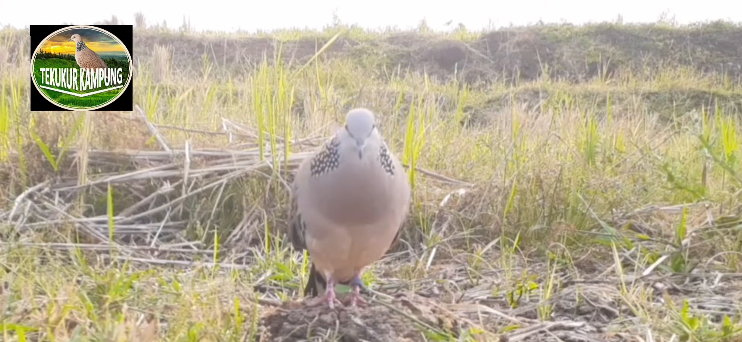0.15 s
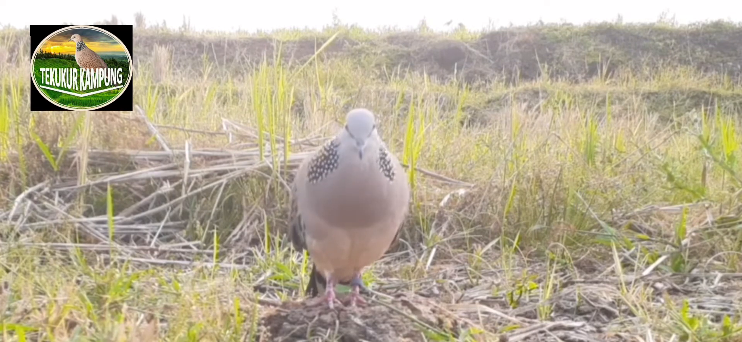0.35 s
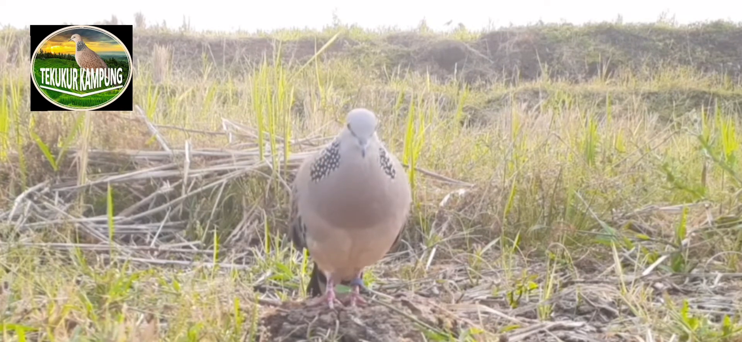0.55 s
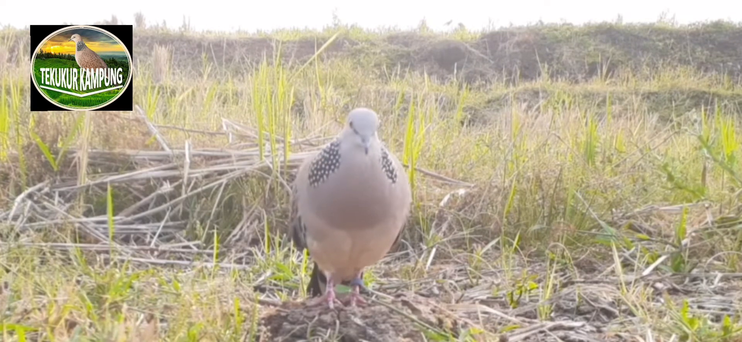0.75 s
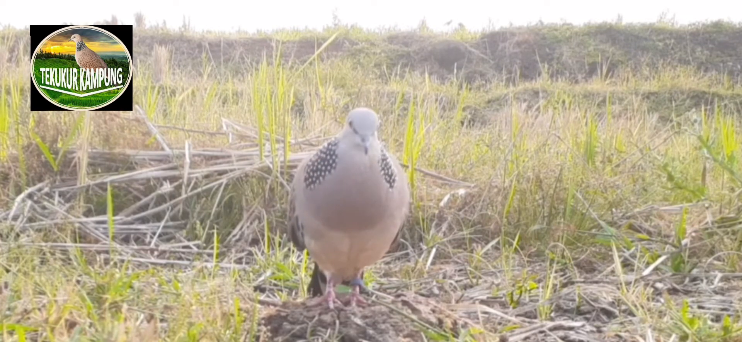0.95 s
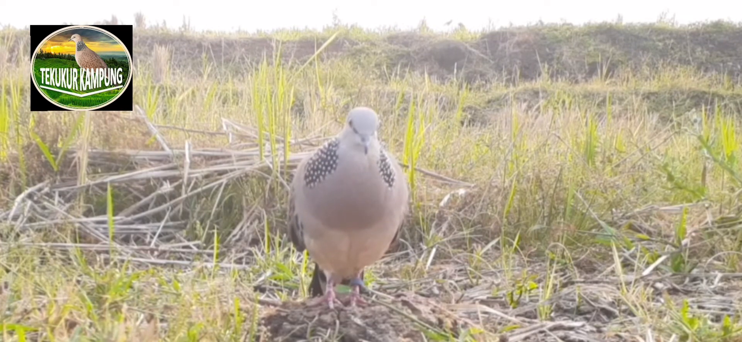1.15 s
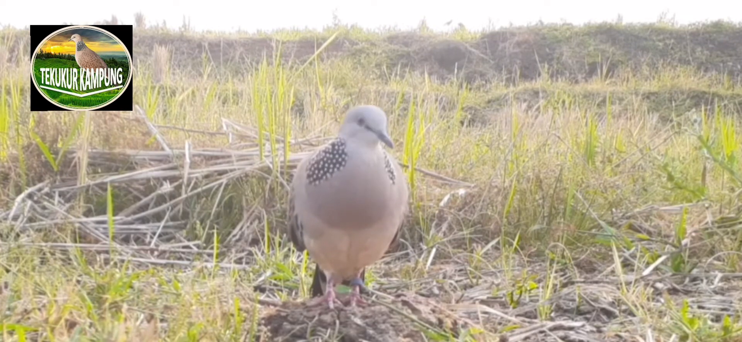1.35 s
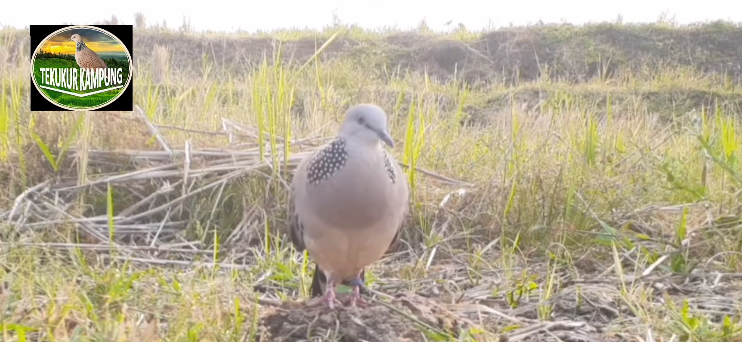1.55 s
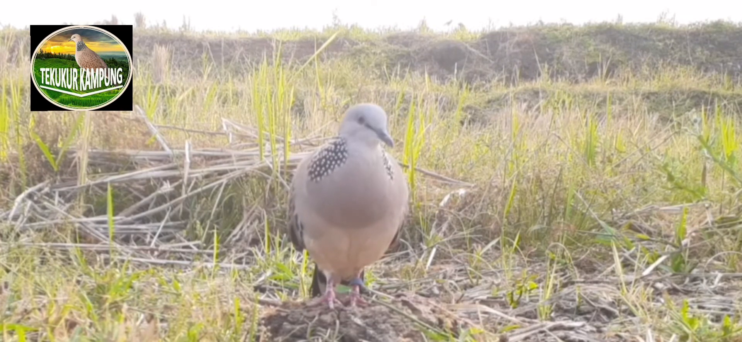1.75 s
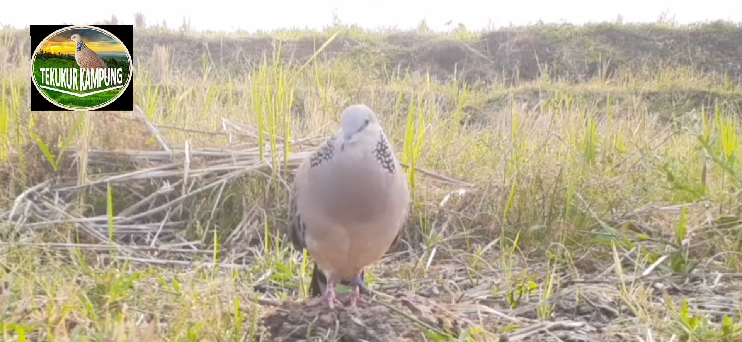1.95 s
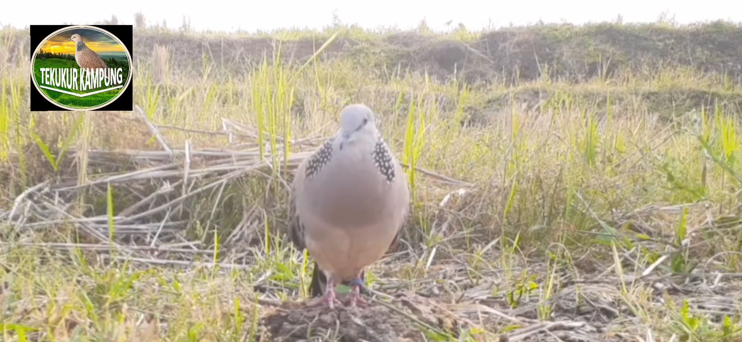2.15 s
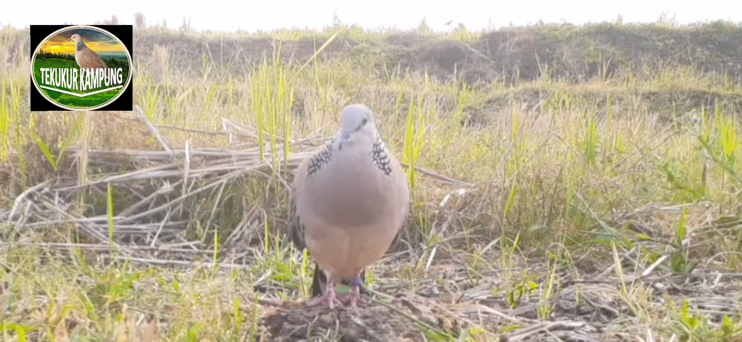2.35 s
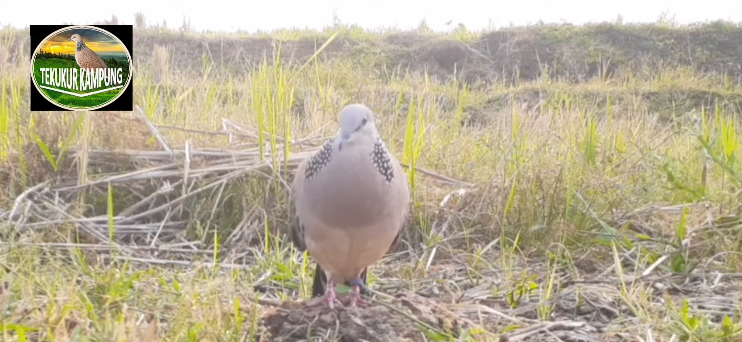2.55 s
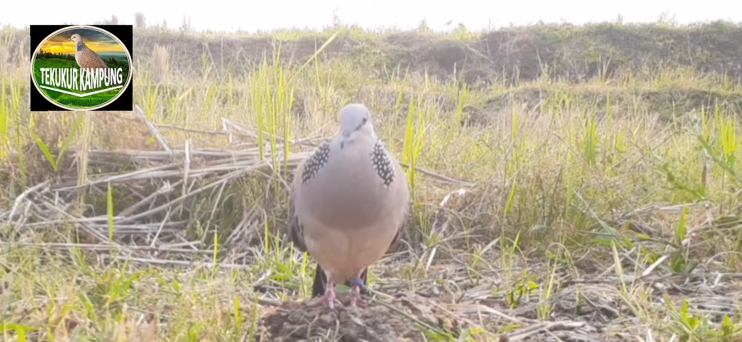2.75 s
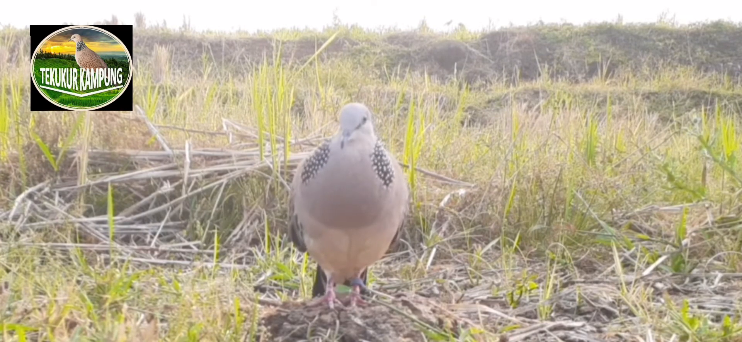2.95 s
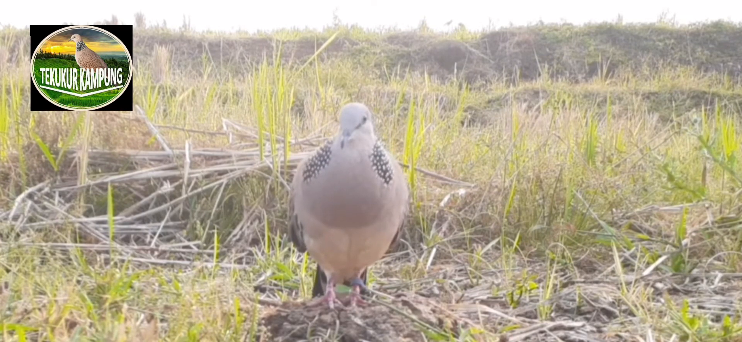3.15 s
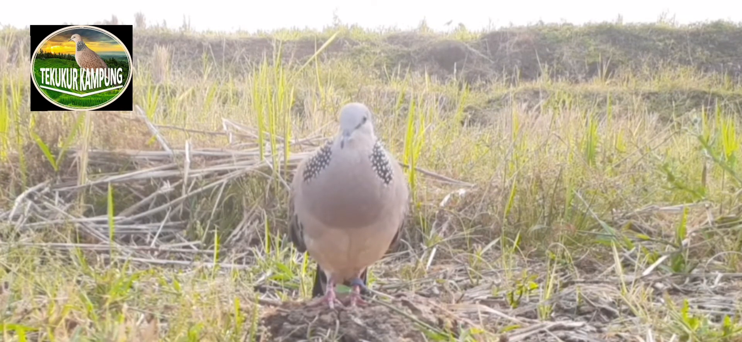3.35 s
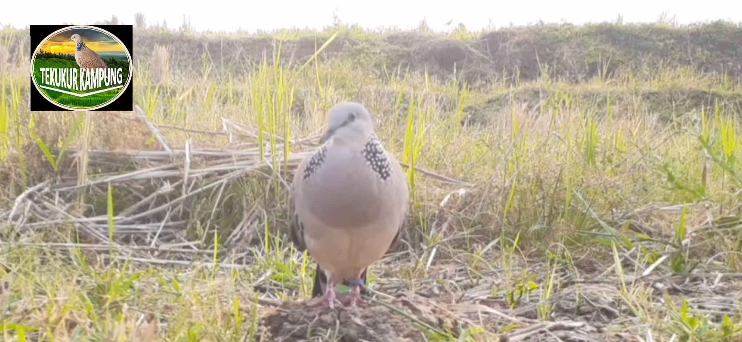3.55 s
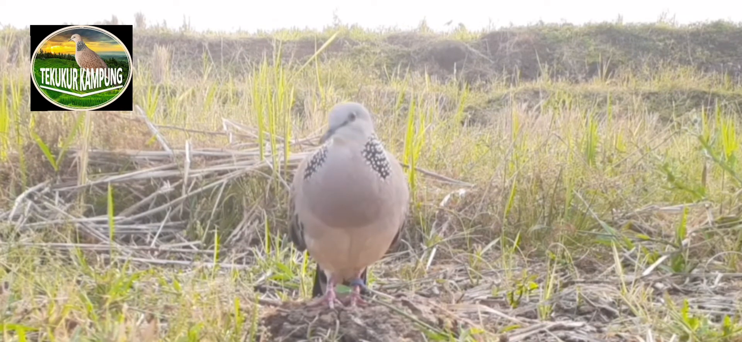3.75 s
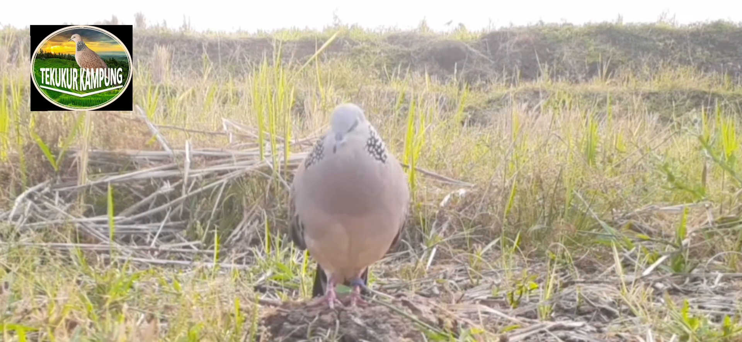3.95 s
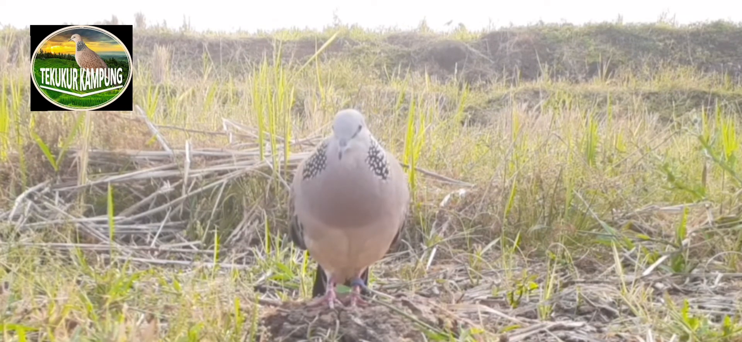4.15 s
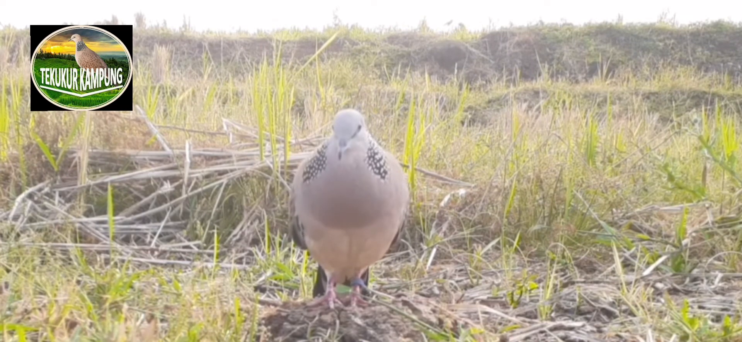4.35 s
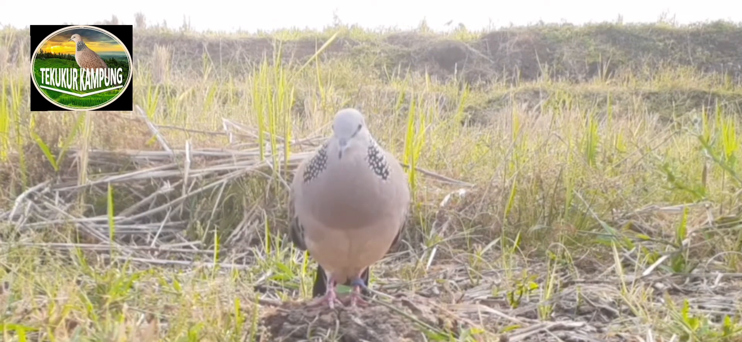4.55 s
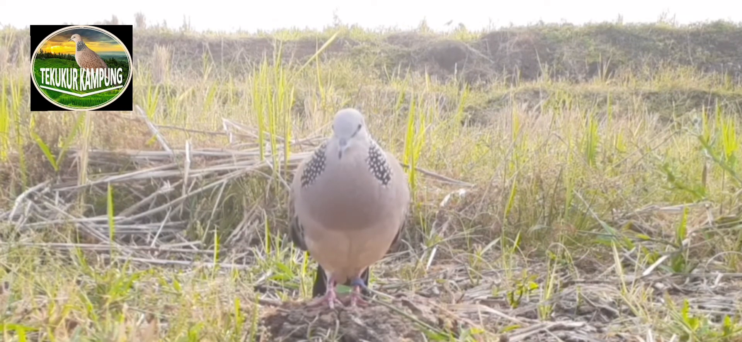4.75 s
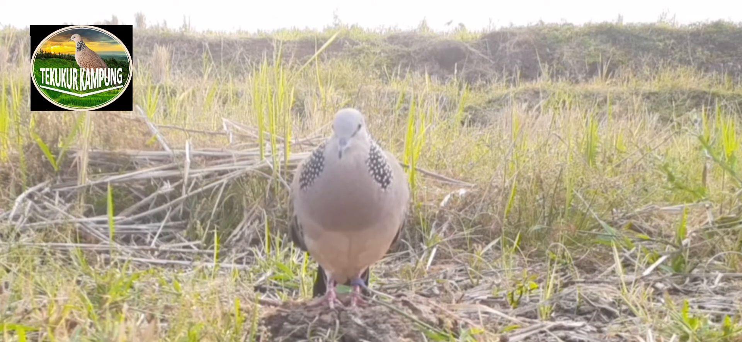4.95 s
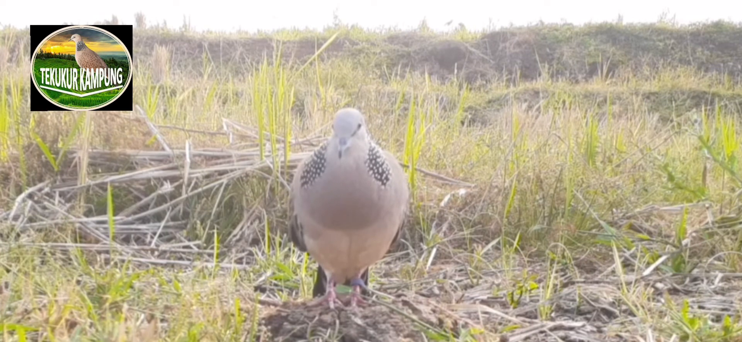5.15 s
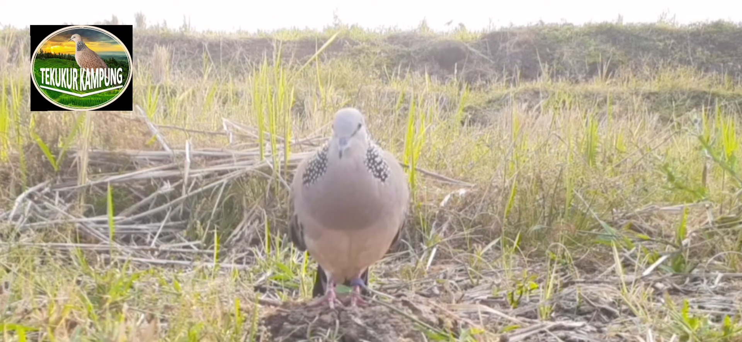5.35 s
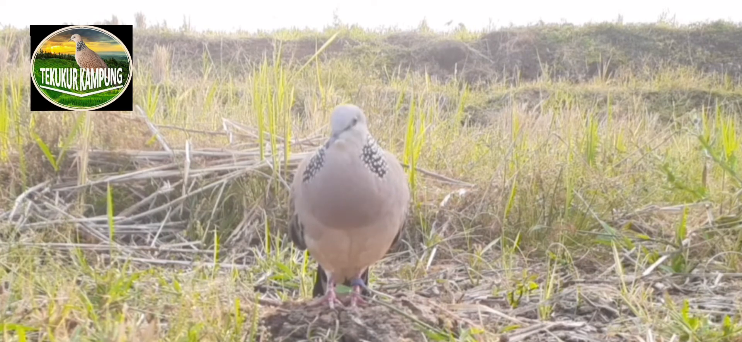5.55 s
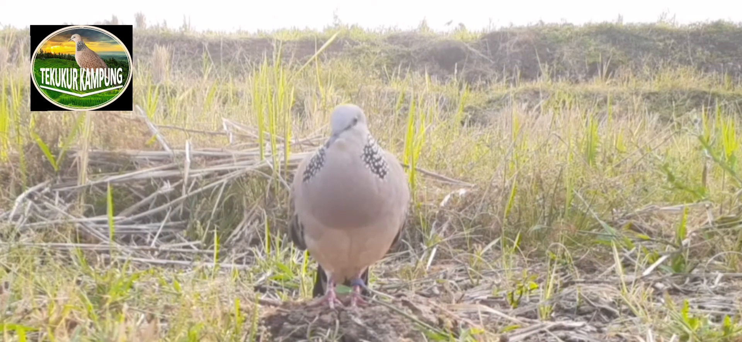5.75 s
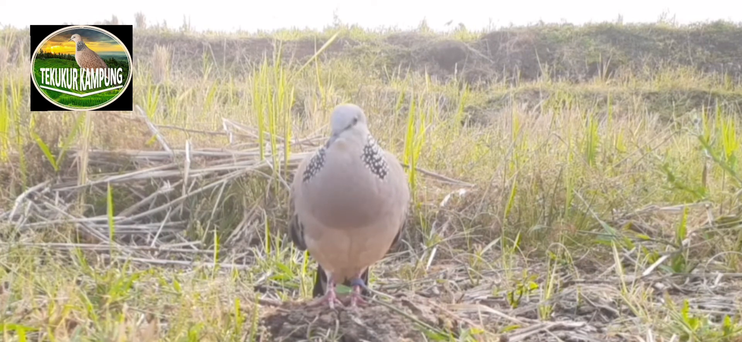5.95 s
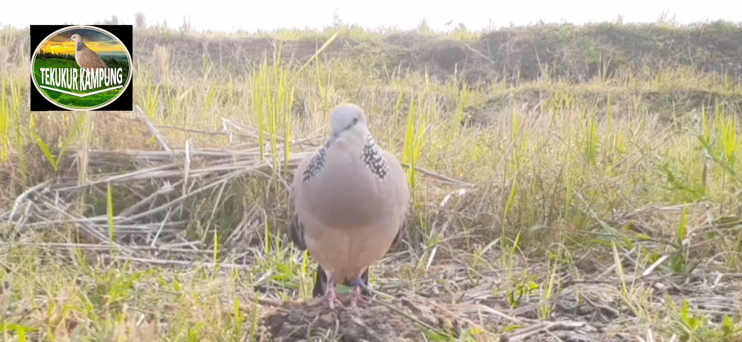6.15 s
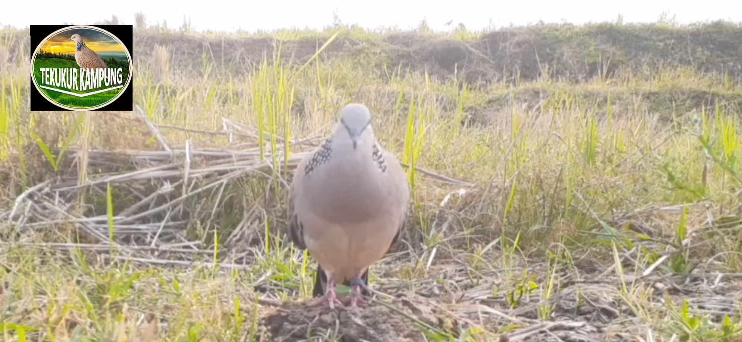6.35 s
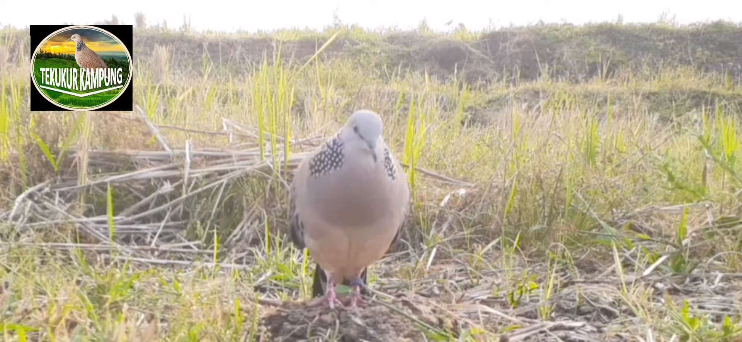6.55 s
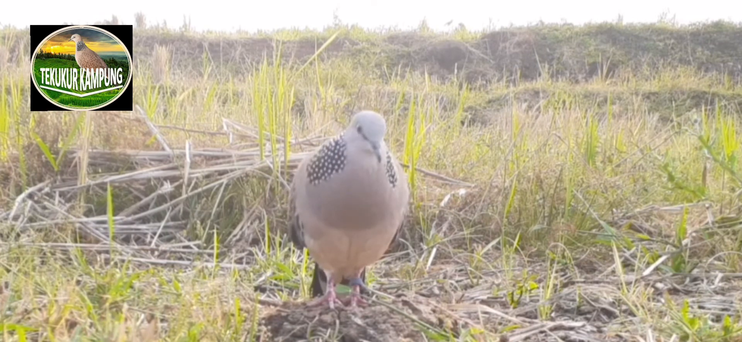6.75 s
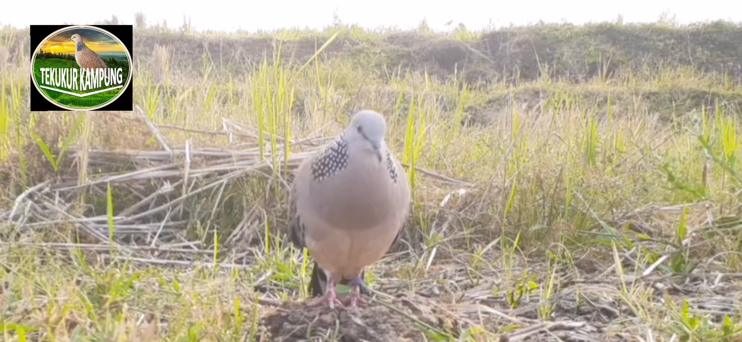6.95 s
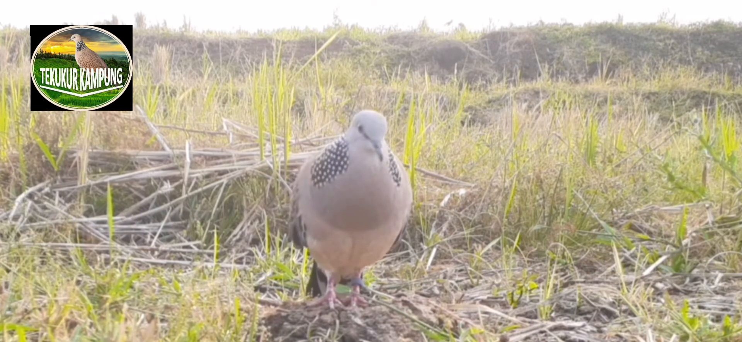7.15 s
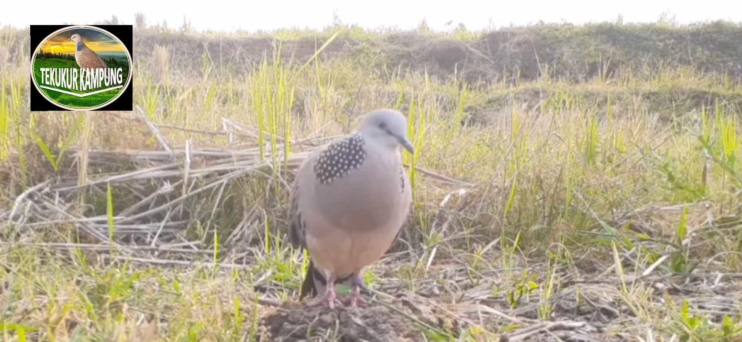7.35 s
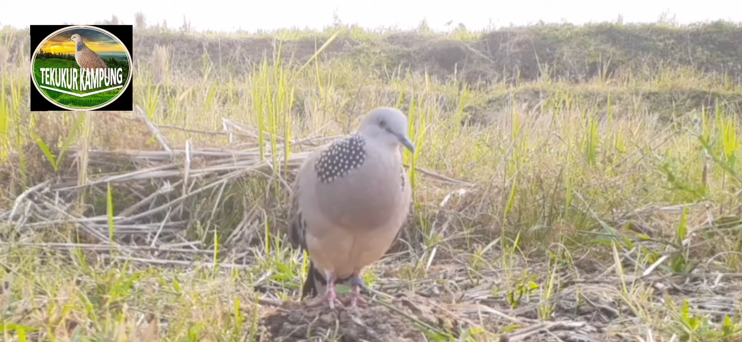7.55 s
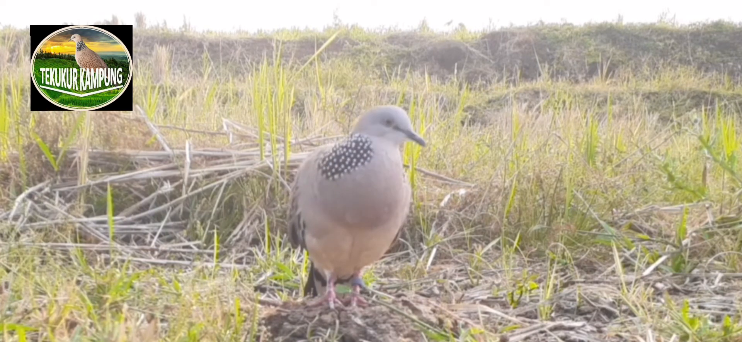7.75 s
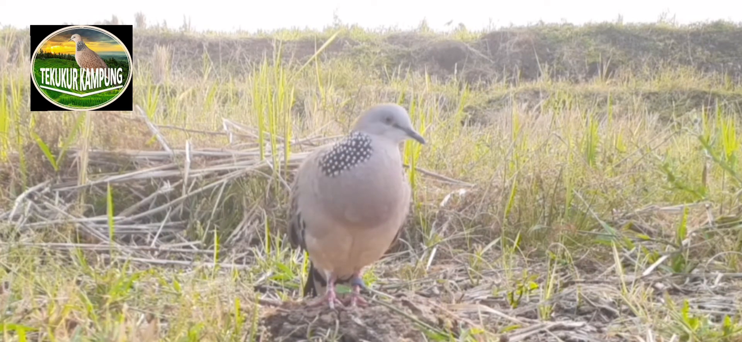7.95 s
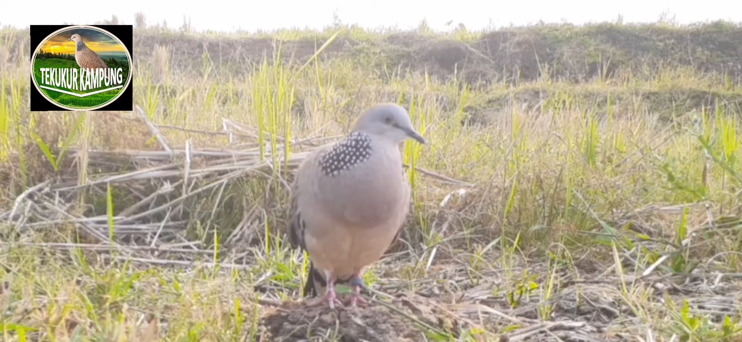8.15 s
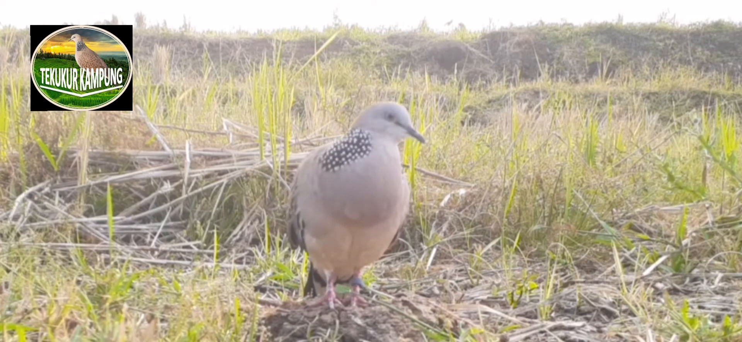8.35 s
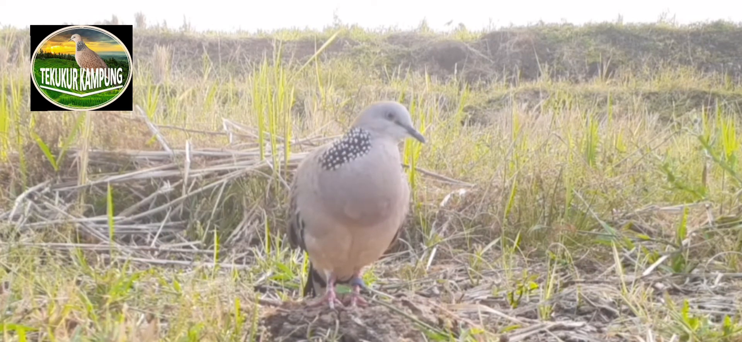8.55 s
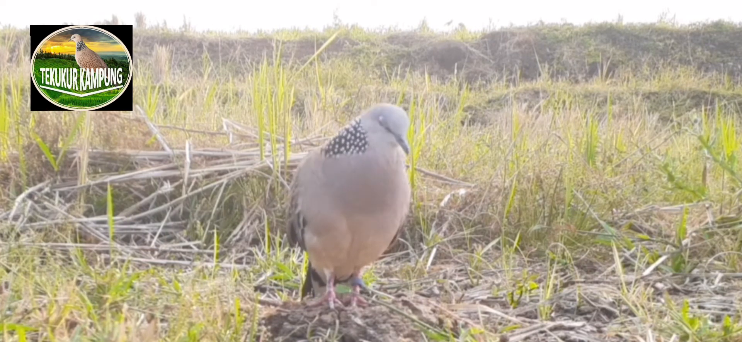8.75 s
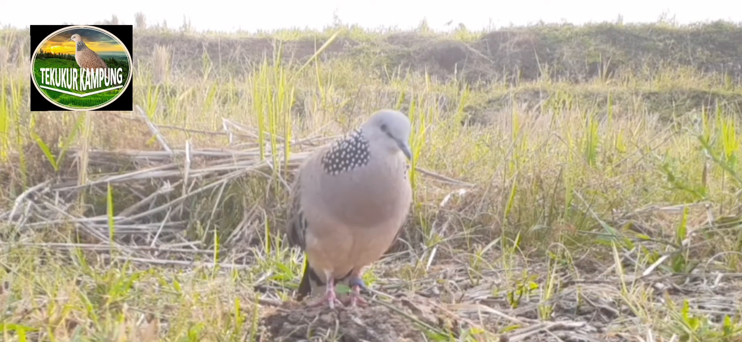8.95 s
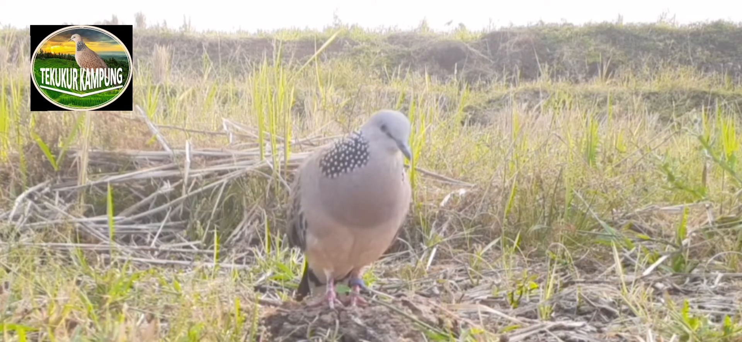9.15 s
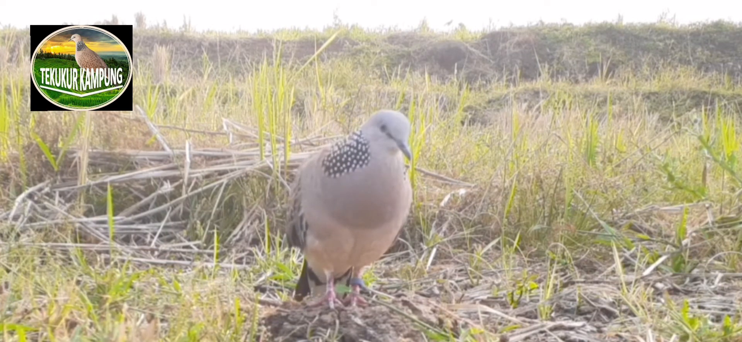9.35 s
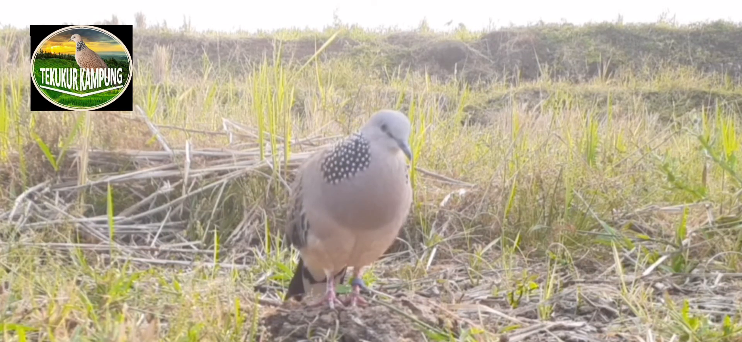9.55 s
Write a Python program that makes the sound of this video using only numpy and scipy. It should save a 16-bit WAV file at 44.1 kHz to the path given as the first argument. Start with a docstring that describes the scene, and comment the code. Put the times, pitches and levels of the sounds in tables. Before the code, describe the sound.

In a quiet field, a nearby dove repeats two short coos and a long trilled one, with faint rumble and insects behind.

```python
"""Two short coos joined by a low purr, then a long trilled coo that sinks away: a spotted dove on the
ground of an open field gives this phrase five times. Its voice is a near-pure tone, amplitude-modulated
by a fluttering membrane and filtered by the resonance of the inflated throat. Another dove answers far
off, over a faint low rumble and the thin shrill of insects. A noise gate dips the level between calls."""
import sys
import numpy as np
from scipy import signal
from scipy.fft import rfft, irfft
from scipy.io import wavfile
from scipy.ndimage import uniform_filter1d, minimum_filter1d

SR = 44100
rng = np.random.default_rng(int(sys.argv[2]) if len(sys.argv) > 2 else 0)


def wrap_up_sound(samples):
    """Save the sound to the file named by the first command line argument, as 16-bit audio."""
    columns = np.atleast_2d(samples).T
    # keep every value between -1 and 1, then stretch to whole-number steps
    tamed = np.clip(columns, -1, 1)
    steps = np.round(tamed * 32767).astype(np.int16)
    wavfile.write(sys.argv[1], SR, steps)


N = 427329
TIME = np.arange(N) / SR


def doves(octave_db=-29.5, whistle_db=-53.5):
    """Source and filter: the syrinx makes the tone, the throat colours it and the field reflects it."""
    # Each row: start, purr start, purr end and end in seconds, drive of the first and second coo in dB,
    # slack at the bottom of the purr (0 is taut).
    double_coos = [(0.014, 0.065, .229, .329, -7.8, -6.5, .75), (1.895, 1.969, 2.110, 2.219, -8.3, -5.5, 1),
                   (3.936, 4.006, 4.173, 4.283, -7.5, -4.8, 1), (6.427, 6.490, 6.657, 6.780, -5, -5.2, 1),
                   (8.766, 8.835, 9.014, 9.125, -6, -5.2, 1.04)]
    # Each row: start, fall start and end in seconds, drive in dB, first flutter rate per second,
    # seconds for that rate to double. The two faint rows are the far dove.
    long_coos = [(0.487, 0.823, 1.04, -4.5, 49.6, 0.29), (2.383, 2.685, 2.892, -4.5, 42.6, 0.25),
                 (4.439, 4.757, 4.98, -4.5, 45, 0.29), (5.6, 5.923, 6.1, -58, 35, 0.27),
                 (6.94, 7.251, 7.48, -4.5, 41.8, .252), (7.81, 8.105, 8.29, -58.5, 43, .3),
                 (9.286, 9.591, 9.84, -4.5, 43.4, 0.26)]
    notes = sum(double_coo(*row) for row in double_coos) + sum(long_coo(*row) for row in long_coos)
    tone, octave, whistle, rasp_strength = notes
    voice = throat(tone + from_db(octave_db) * octave + grunt())
    breath = bill_air(tone, rasp_strength)
    return (voice + field(voice) + from_db(whistle_db) * whistle + breath) * pan(left_db=3.6)


def double_coo(start, purr_begins, purr_ends, end, first_db, second_db, sag_depth):
    """Tension sets pitch and drive: between two coos the pressure sags and the slack membrane purrs."""
    taut_hz, slack_hz, slack_db, droop_hz = 737.3, 310.3, 12, 65
    rise_s, drop_s, drop_db = .034, .032, 3
    purr_per_s, purr_edge_s, purr_depth, purr_swing_hz, purr_push_db = 84, .007, .81, 109, 1.5
    t = TIME[(TIME > start) & (TIME < end)]
    progress = (t - purr_begins) / (purr_ends - purr_begins)
    through_purr = ramp(progress)
    through_second = ramp((t - purr_ends) / (end - purr_ends))
    purring = ramp(1 + np.minimum(t - purr_begins, purr_ends - t) / purr_edge_s) ** .5
    # the membrane tightens at the start, sags in the purr and lets go at the end
    onset = ramp(1 - (t - start) / rise_s) ** 2
    sag = sag_depth * np.sin(np.pi * through_purr ** .8)
    drop = ramp(1 - (end - t) / drop_s) ** 1.9
    slack = onset + sag + drop
    pitch = taut_hz - slack_hz * slack - droop_hz * through_second ** 2
    push_db = (second_db - first_db + purr_push_db * purring) * through_purr
    drive_db = first_db + push_db - slack_db * slack - drop_db * drop
    # a whole number of flutters fills the purr, fastest in the slack middle
    count = np.round(purr_per_s * (purr_ends - purr_begins))
    flutters = count * (progress - .091 * np.sin(2 * np.pi * progress) / (2 * np.pi))
    swing = purr_swing_hz * purring * (1 - .64 * sag)
    return syrinx(t, pitch, drive_db, purr_depth * purring, swing, flutters)


def long_coo(start, fall_begins, end, level_db, first_rate, doubling_s):
    """Modulation of level and pitch: a deep trill grows shallower as it quickens, then sinks away."""
    trill_hz, fastest_per_s, swell_db = 712.5, 100, .5
    slow_depth, fast_depth, slow_swing_hz, fast_swing_hz = .96, .48, 300.6, 45
    scoop_s, scoop_hz, scoop_db = .038, 157, 14   # it starts low and soft
    fall_hz, fall_db = 286, 19
    t = TIME[(TIME > start) & (TIME < end)]
    rate = np.minimum(first_rate * (1 + ((t - start) / doubling_s) ** 2.5), fastest_per_s)
    slow = (fastest_per_s - rate) / (fastest_per_s - first_rate)
    scoop = ramp(1 - (t - start) / scoop_s)
    fall = ramp((t - fall_begins) / (end - fall_begins))
    trilling = 1 - .55 * ramp(2 * fall)
    depth = (fast_depth + (slow_depth - fast_depth) * slow) * trilling * (1 - scoop ** 3)
    swing = (fast_swing_hz + (slow_swing_hz - fast_swing_hz) * slow * (1 - scoop) ** 2) * trilling
    pitch = trill_hz + .3 * swing - scoop_hz * scoop - fall_hz * fall
    drive_db = level_db - swell_db * slow - scoop_db * scoop ** 4.1 - fall_db * fall ** 1.4
    return syrinx(t, pitch, drive_db, depth, swing, np.cumsum(rate) / SR)


def syrinx(t, pitch, drive_db, depth, swing, flutters, wander=.25, jitter=.006, uneven_db=1.4):
    """A membrane valve modulates the tone: each flutter snaps it open, arches the pitch and shuts it."""
    # Each row: share of the flutter cycle, opening of the membrane from 0 to 1.
    flutter_shape = [(0, 0), (.15, .03), (.3, 1), (.68, .72), (.9, .03), (1, 0)]
    depth = np.clip(depth, 0, 1)
    # a shallow flutter loses its beat, and only now and then shuts fully
    flutters = flutters + wander * (1 - depth) * waver(t, per_s=44)
    nearest = np.round(flutters - np.floor(flutters.min())).astype(int)
    slip, strength, looseness = rng.uniform(-1.6, 1, (200, 3))[nearest].T
    closure = ramp(depth * (1 + 1.6 * (1 - depth) * looseness))
    cycle = flutters % 1
    opening = uniform_filter1d(1 - closure * (1 - along(flutter_shape, cycle)[0]), size=36)
    hz = (pitch - swing * np.cos(np.pi * cycle) ** 2) * (1 + jitter * waver(t, per_s=440))
    # the tone restarts out of step after each closure
    slips = np.diff(np.floor(flutters), prepend=np.floor(flutters[0])) * np.pi * slip * closure
    smooth_slips = np.convolve(slips, signal.get_window("hann", 100) / 50, "same")
    phase = np.cumsum(2 * np.pi * hz / SR + smooth_slips)
    strength_db = uniform_filter1d(uneven_db * depth * strength, size=256)
    edge_fade = np.sin(np.pi / 2 * ramp(np.minimum(t - t[0], t[-1] - t) / .009)) ** 1.5
    level = from_db(drive_db + strength_db) * opening * edge_fade
    tone = level * np.sin(phase)
    octave = level ** 1.3 * np.sin(2 * phase)
    whistle = level ** 3 * np.sin(8 * phase)   # a thin harmonic of the hard-blown tone
    rasp_strength = level ** 2 * depth
    note = np.zeros((4, N))
    note[:, np.round(t * SR).astype(int)] = tone, octave, whistle, rasp_strength
    return note


def throat(x, hz=623.5, width_hz=350):
    """Cavity resonance: the inflated throat acts as one broad band-pass, applied twice."""
    radius = np.exp(-np.pi * width_hz / SR)
    b = (1 - radius ** 2) / 2 * np.array([1, 0, -1])
    a = [1, -2 * radius * np.cos(2 * np.pi * hz / SR), radius ** 2]
    return signal.lfilter(b, a, signal.lfilter(b, a, x + 1e-18))


def grunt(tilt_db=-6.0):
    """A harmonic series without its fundamental: one soft, low buzz within the third phrase."""
    # Each row: time in seconds, pitch in Hz, level of the fourth harmonic in dB ahead of the throat.
    contour = [(4.32, 192, -73), (4.34, 193, -39), (4.365, 170.5, -41), (4.382, 165, -50.5),
               (4.4, 151, -55.5)]
    pitch, level_db = along(contour, TIME)
    phase = 2 * np.pi * np.cumsum(pitch) / SR
    buzz = sum(from_db(tilt_db * (k - 4)) * np.cos(k * phase) for k in range(2, 6))
    return buzz * from_db(level_db) * (TIME > contour[0][0]) * (TIME < contour[-1][0])


def bill_air(tone, rasp_strength, air_db=-57.5, rasp_db=-51):
    """Flow noise: air rushes through the bill in step with the tone and rasps when it flutters."""
    # Each row: frequency in Hz, relative spectral density in dB.
    air_spectrum = [(900, 4), (1300, -1), (1800, -12), (2400, -6), (3400, -13), (4600, -8.5), (5600, -5.5),
                    (5900, 5), (6150, -9.5), (7500, -8.5), (12000, -17)]
    airflow = np.sqrt(np.abs(uniform_filter1d(tone ** 2, size=1024)))
    air = from_db(air_db) * airflow * noise(air_spectrum, likeness=[(1000, 1.0), (6000, .63)])
    rasp = from_db(rasp_db) * uniform_filter1d(rasp_strength, size=3072)
    return air + rasp * noise_band(hz=5440, width_hz=1200)[0]


def field(x, echo_s=.031, echo_db=-34, scatter_db=-37, decay_s=.25):
    """Reflection and scattering: a bank returns one weak echo, ground and stubble a short tail."""
    t = TIME[:SR // 2]
    scatter = rng.standard_normal((2, len(t))) * from_db(-60 * t / decay_s) * (t > .008)
    scatter /= np.sqrt(np.sum(scatter ** 2, axis=1, keepdims=True))
    echo = from_db(echo_db) * np.interp(TIME - echo_s, TIME, x, left=0)
    return echo + from_db(scatter_db) * signal.fftconvolve(x[None], scatter, axes=1)[:, :N]


def insects(first_rasp_s=.15, rasp_every_s=.99, rasp_length_s=.27, whine_hz=13848):
    """Narrow-band noise sounds shrill: a chorus to the left and two lone insects, with hiss and whine."""
    # Each row: frequency in Hz, relative spectral density in dB.
    hiss_spectrum = [(1000, -16), (2300, -21), (3500, -20.5), (6000, -19.5), (7400, -22), (8200, -15),
                     (8900, -2), (9300, -0.5), (10300, -16.5), (11100, -16.5), (11900, -25), (15500, -31.5)]
    # Each row: time in seconds, level in dB before panning, for the insect that joins with a high buzz.
    buzz_levels = [(5.9, -92), (6.4, -73), (9.6, -69)]
    hiss = from_db(-57) * noise(hiss_spectrum, likeness=[(1000, .0029), (10000, .062)])
    chorus = signal.sosfiltfilt(signal.butter(2, [7600, 12000], "band", fs=SR, output="sos"), hiss)
    rasping = (TIME - first_rasp_s) % rasp_every_s < rasp_length_s
    rasp = from_db(-73) * uniform_filter1d(1.0 * rasping, size=2048) * noise_band(hz=7830, width_hz=360)
    buzz = from_db(along(buzz_levels, TIME)[0]) * noise_band(hz=11100, width_hz=540)
    whine = from_db(-85) * np.sqrt(2) * np.sin(2 * np.pi * whine_hz * TIME)
    return hiss - chorus + rasp + (chorus + buzz + whine) * pan(left_db=8.5)


def rumble(lowest_hz=44):
    """Low-frequency noise, largely correlated between the ears: a far rumble that drifts in level."""
    # Each row: time in seconds, level in dB before the bass cut and panning.
    drift = [(0, -43.5), (2.2, -41.5), (3.5, -43.5), (5.6, -44), (6.8, -43), (9.6, -42)]
    # Each row: frequency in Hz, relative spectral density in dB.
    spectrum = [(15, -63.5), (25, -30), (36, -14), (53, -7), (106, 1), (192, -1.5), (273, -8), (302, -10),
                (340, -11.5), (438, -17.5), (518, -24.5), (714, -30.5), (950, -43.5), (1400, -50.5),
                (1820, -79), (3080, -120)]
    # Each row: frequency in Hz, left-right correlation.
    likeness = [(30, .4), (60, .85), (150, .96), (300, 1), (640, 1), (1000, 0)]
    low = from_db(along(drift, TIME)[0]) * noise(spectrum, likeness)
    bass_cut = signal.butter(3, lowest_hz, "high", fs=SR, output="sos")
    return signal.sosfilt(bass_cut, low) * pan(left_db=2.2)


def noise_gate(x, opens_db=-40, cut_db=3.5, hold_s=.04, fade_s=.061):
    """Level-dependent gain: the sound dips while quiet above the rumble, and lifts just ahead of a coo."""
    heard = signal.sosfilt(signal.butter(4, 420, "high", fs=SR, output="sos"), x.mean(axis=0))
    quiet = 1.0 * (uniform_filter1d(heard ** 2, size=1024) < from_db(opens_db) ** 2)
    held = minimum_filter1d(quiet, 1 + int(hold_s * SR))
    shut = uniform_filter1d(held, 1 + int(fade_s * SR))
    return x * from_db(-cut_db * shut)


def noise(spectrum, likeness):
    """Spectrally shaped noise of rms 1; mixing mid and side sets the left-right correlation."""
    hz = np.arange(N // 2 + 1) * SR / N
    mid, side = rfft(rng.standard_normal((2, N))) * from_db(at_hz(spectrum, hz))
    alike = np.clip(at_hz(likeness, hz), -1, 1)
    return rms_one(irfft(np.sqrt(1 + alike) * mid + np.sqrt(1 - alike) * side * [[1], [-1]], N))


def noise_band(hz, width_hz):
    """Band-passed stereo noise of rms 1."""
    band = signal.butter(2, [hz - width_hz / 2, hz + width_hz / 2], "band", fs=SR, output="sos")
    return rms_one(signal.sosfilt(band, rng.standard_normal((2, N))))


def waver(t, per_s):
    """A random wobble of spread about 1."""
    knots = np.arange(t[0], t[-1], 1 / per_s)
    return np.interp(t, knots, rng.standard_normal(1000)[:len(knots)])


def along(rows, where):
    """The columns of a table, interpolated along its first column."""
    first, *columns = np.transpose(rows)
    return [np.interp(where, first, c) for c in columns]


def at_hz(points, hz):
    """A spectrum interpolated on a log-frequency axis."""
    known_hz, values = np.transpose(points)
    return np.interp(np.log(hz + 1e-9), np.log(known_hz), values)


def pan(left_db):
    """Left and right gains for a level difference between the ears."""
    return from_db(np.array([[.5], [-.5]]) * left_db)


def from_db(db):
    return 10 ** (np.asarray(db) / 20)


def rms_one(x):
    return x / np.sqrt(np.mean(x ** 2) + 1e-20)


def ramp(x):
    return np.clip(x, 0, 1)


def scene():
    """Superposition: the doves add to the quiet background of the field."""
    return doves() + insects() + rumble()


def record(dry, cutoff_hz=15700):
    """Gating and band-limiting: the background dips between calls and the top is cut steeply."""
    return signal.sosfilt(signal.ellip(10, .1, 80, cutoff_hz, fs=SR, output="sos"), noise_gate(dry))


dry = scene()
out = record(dry)
wrap_up_sound(out)
```